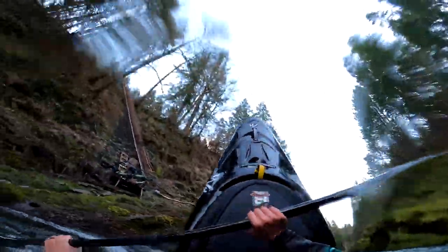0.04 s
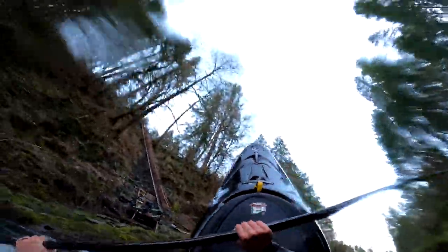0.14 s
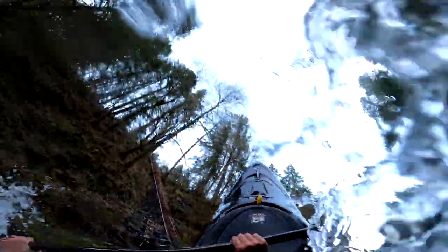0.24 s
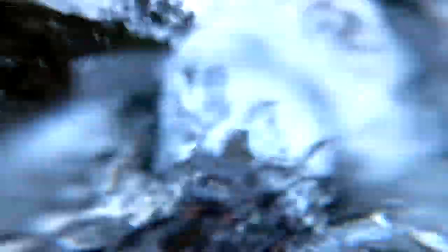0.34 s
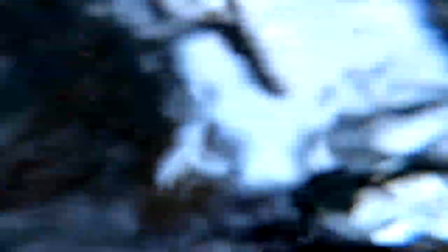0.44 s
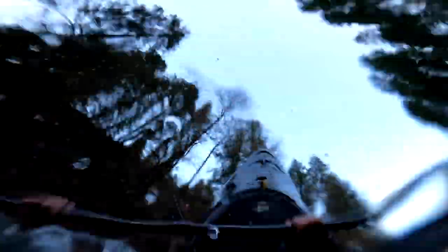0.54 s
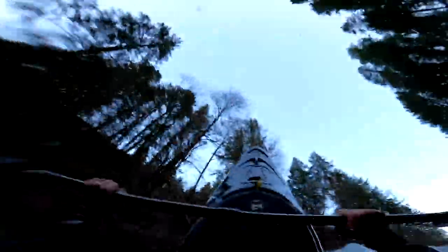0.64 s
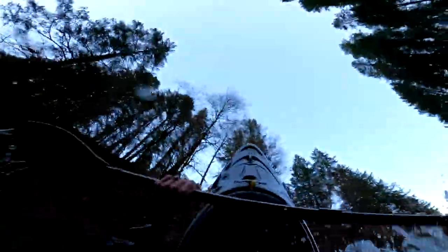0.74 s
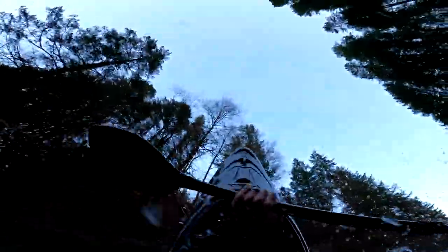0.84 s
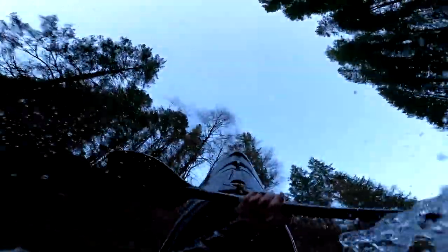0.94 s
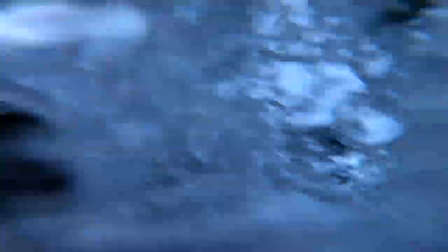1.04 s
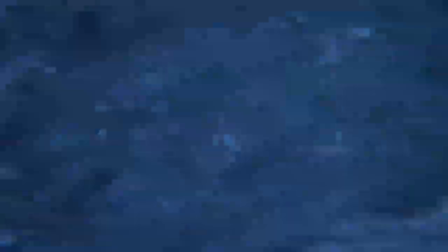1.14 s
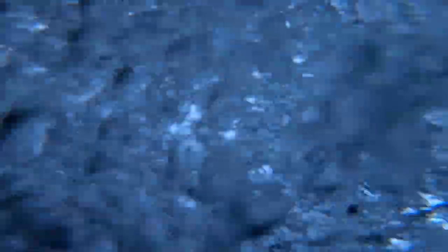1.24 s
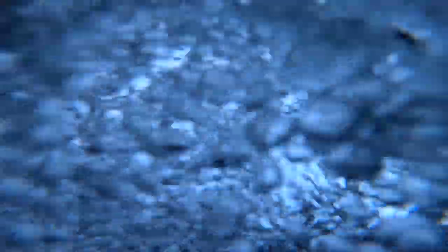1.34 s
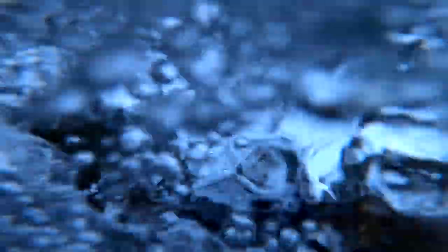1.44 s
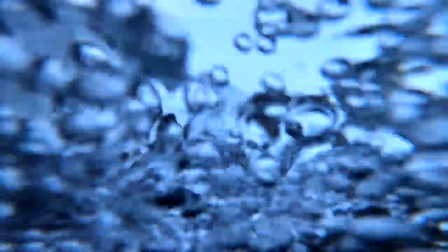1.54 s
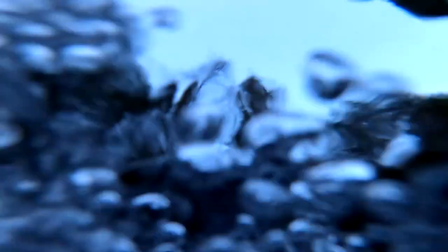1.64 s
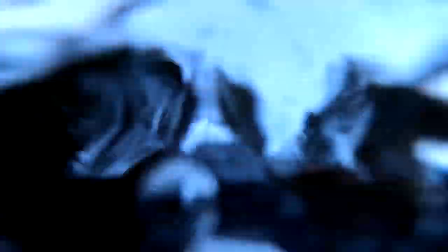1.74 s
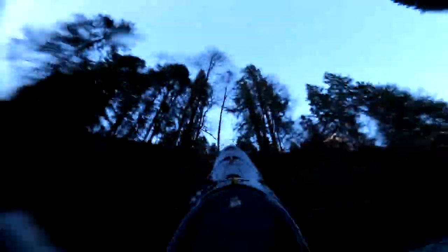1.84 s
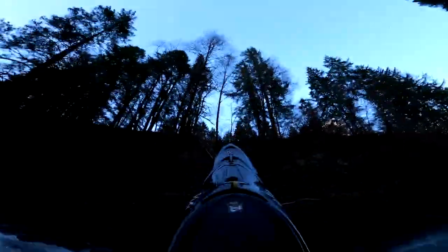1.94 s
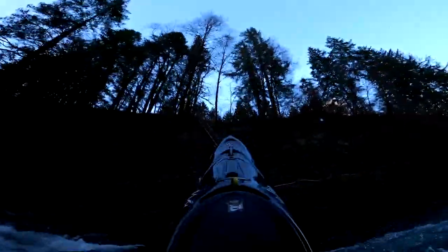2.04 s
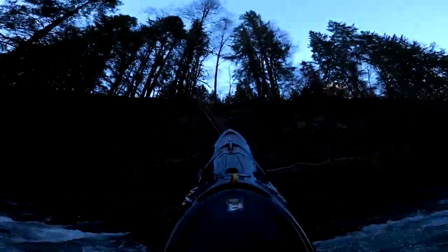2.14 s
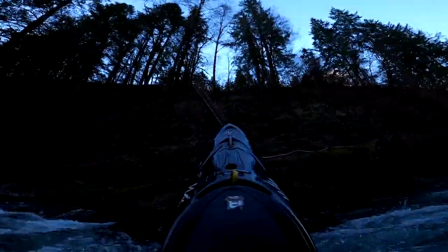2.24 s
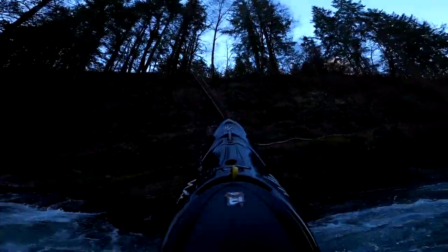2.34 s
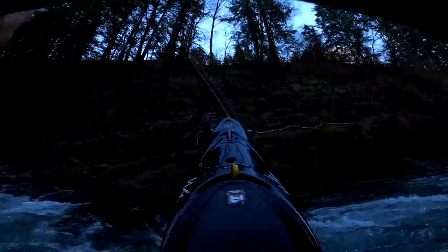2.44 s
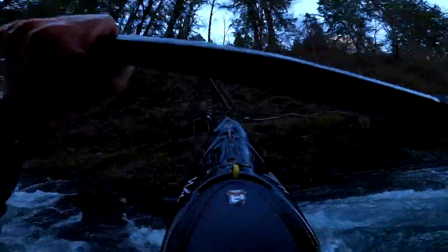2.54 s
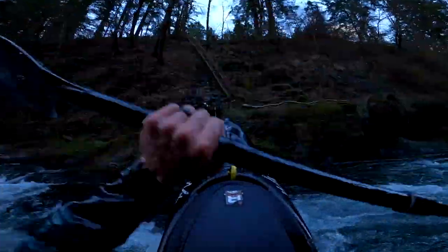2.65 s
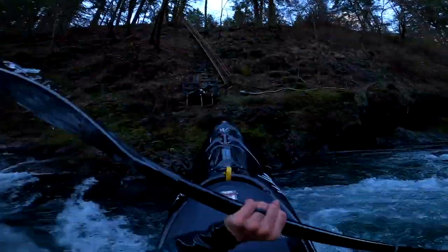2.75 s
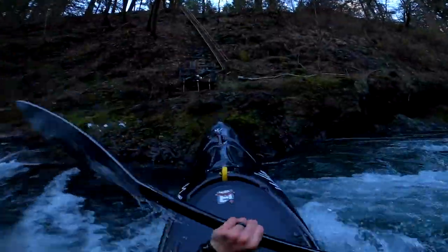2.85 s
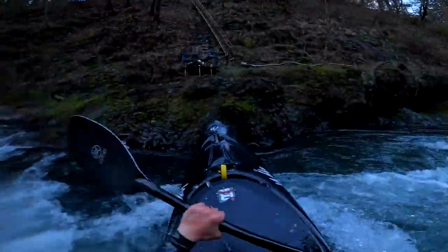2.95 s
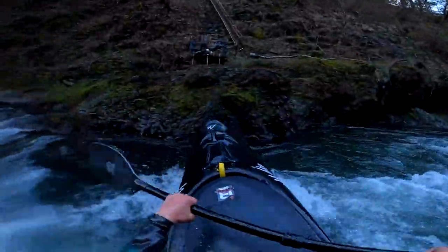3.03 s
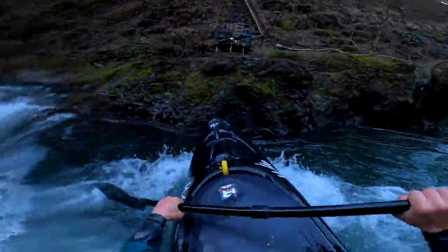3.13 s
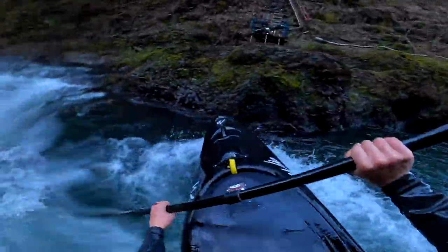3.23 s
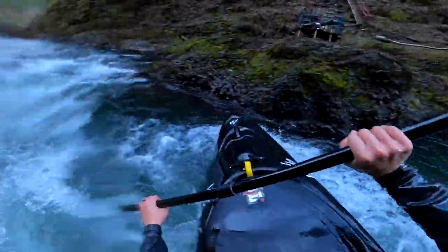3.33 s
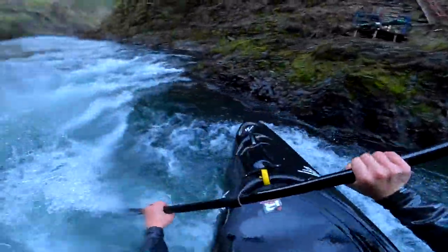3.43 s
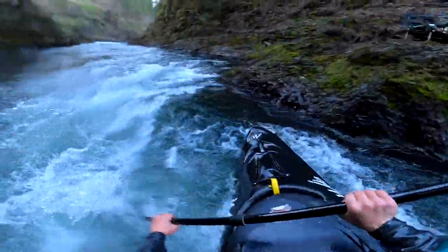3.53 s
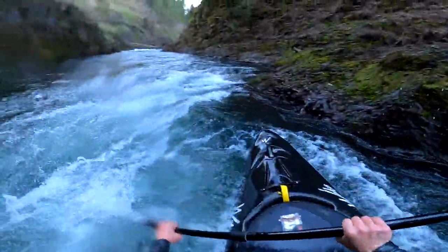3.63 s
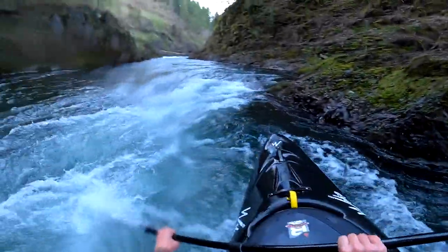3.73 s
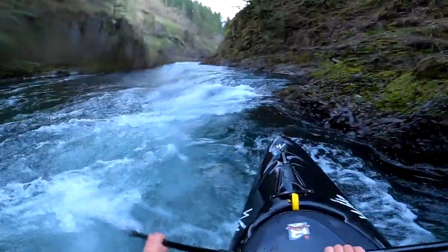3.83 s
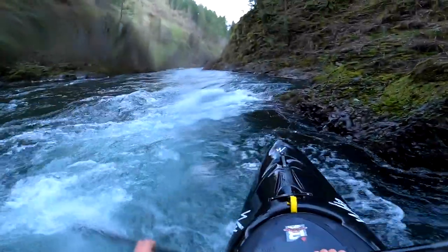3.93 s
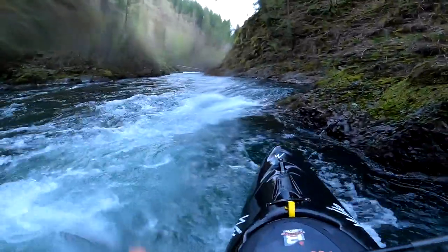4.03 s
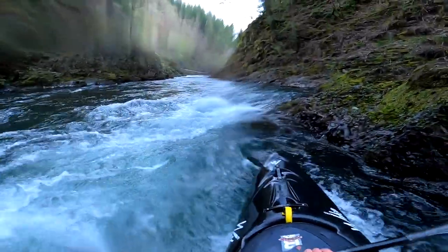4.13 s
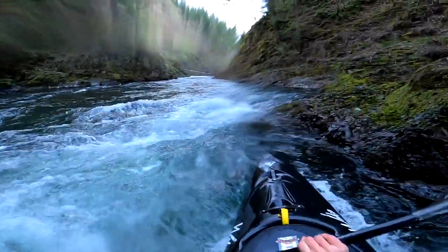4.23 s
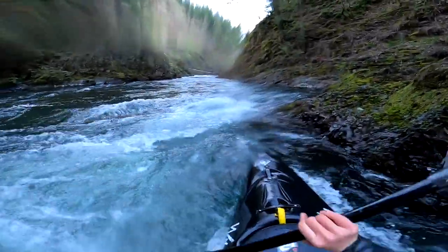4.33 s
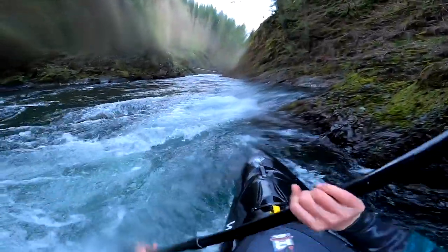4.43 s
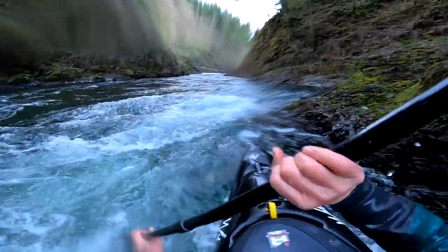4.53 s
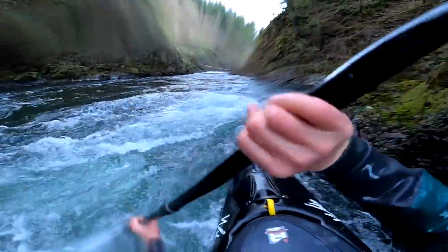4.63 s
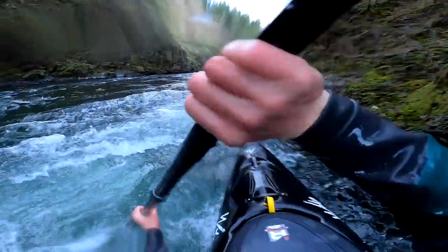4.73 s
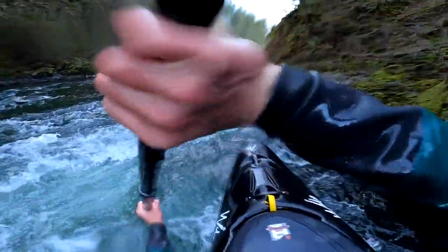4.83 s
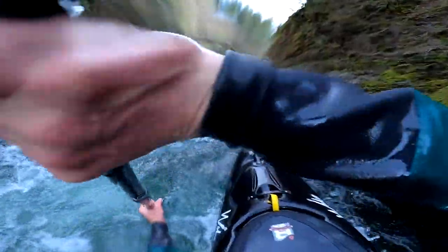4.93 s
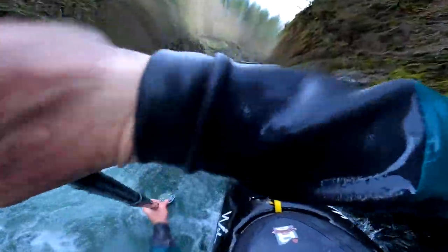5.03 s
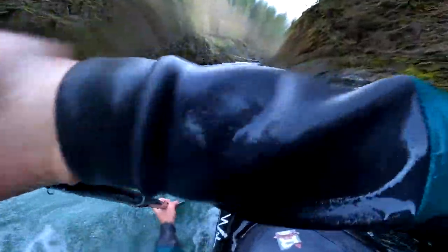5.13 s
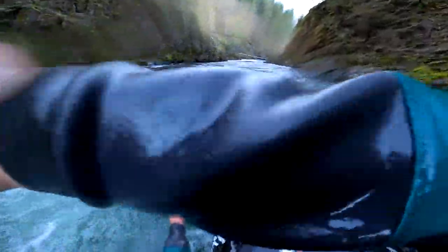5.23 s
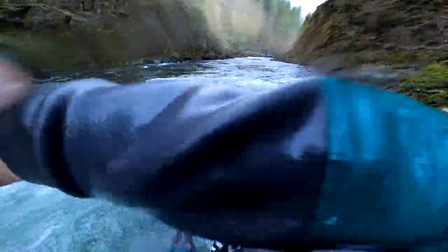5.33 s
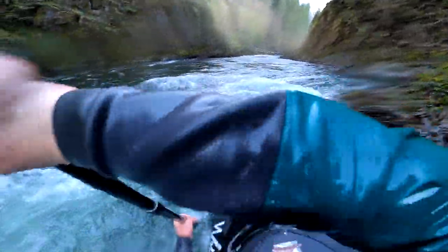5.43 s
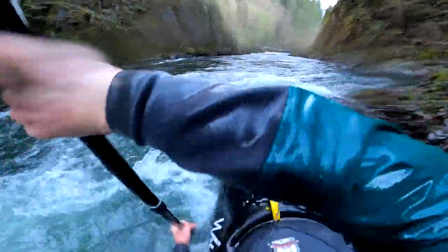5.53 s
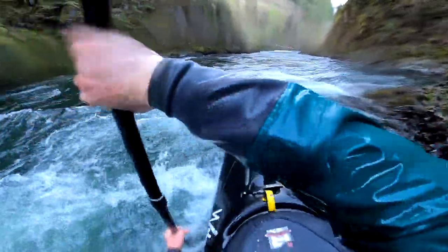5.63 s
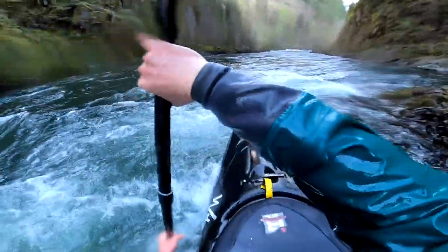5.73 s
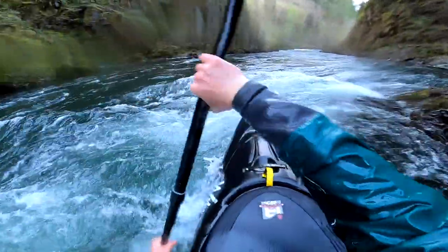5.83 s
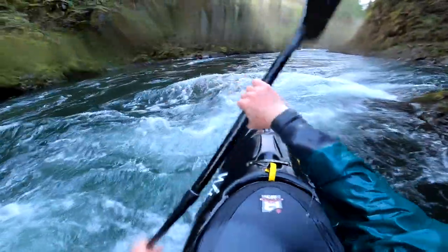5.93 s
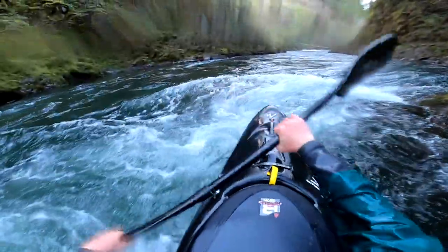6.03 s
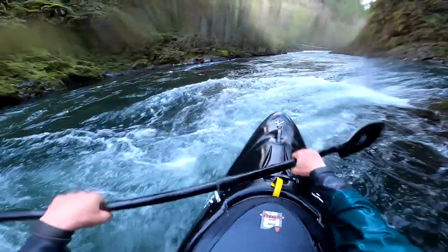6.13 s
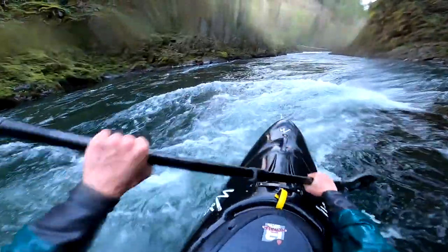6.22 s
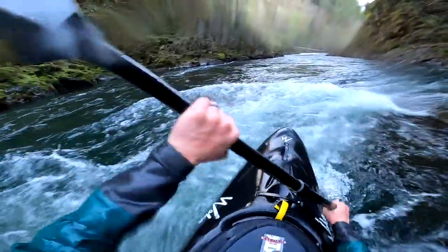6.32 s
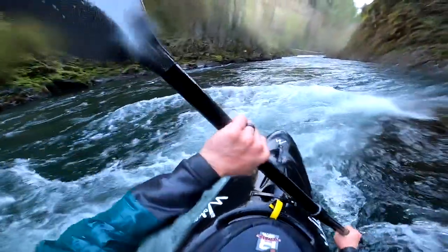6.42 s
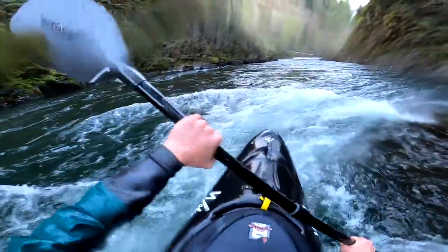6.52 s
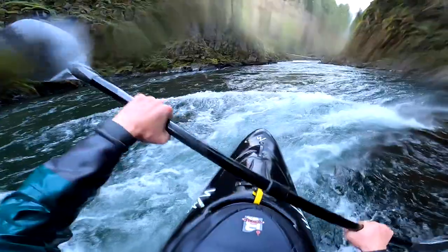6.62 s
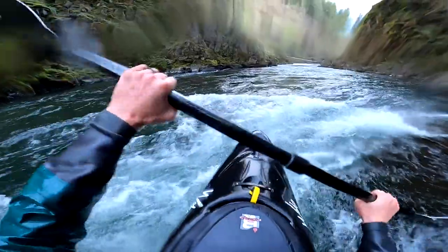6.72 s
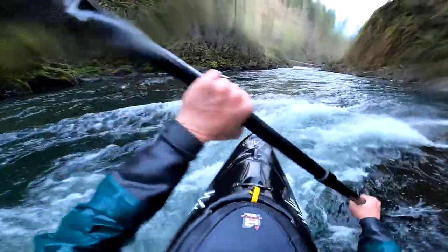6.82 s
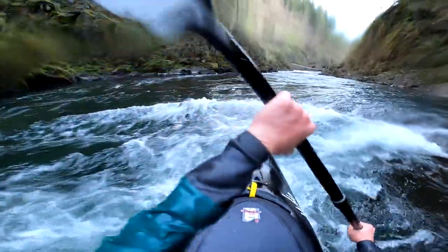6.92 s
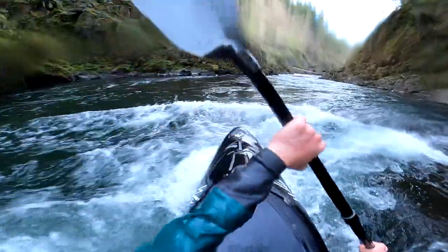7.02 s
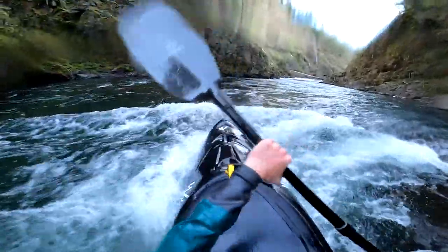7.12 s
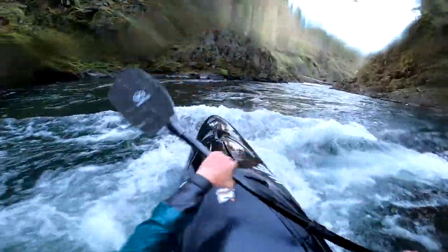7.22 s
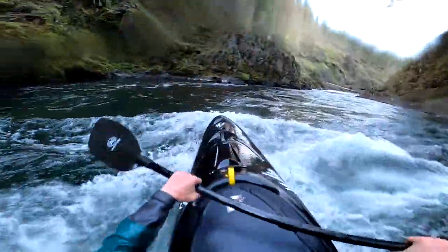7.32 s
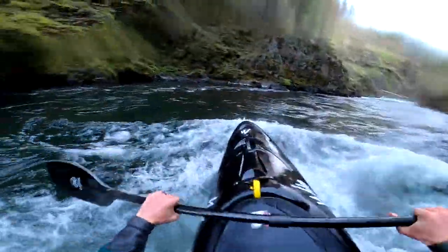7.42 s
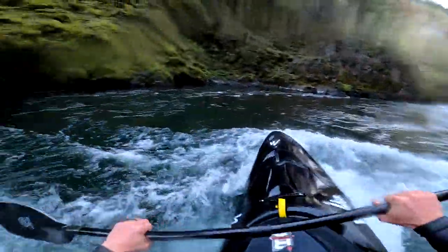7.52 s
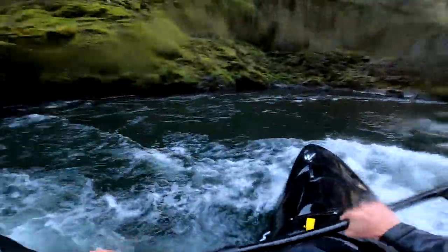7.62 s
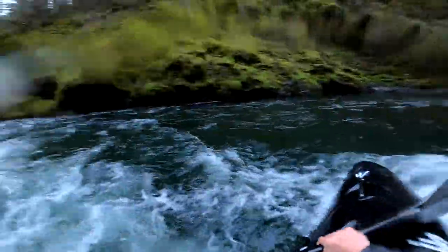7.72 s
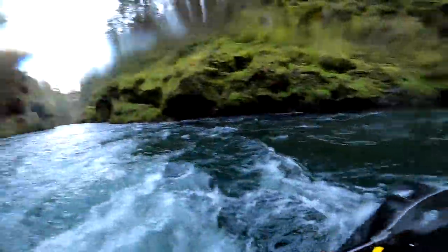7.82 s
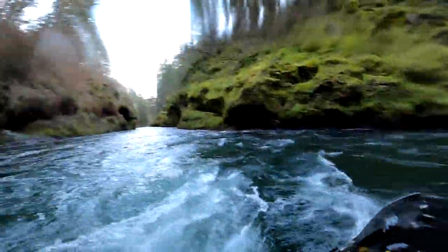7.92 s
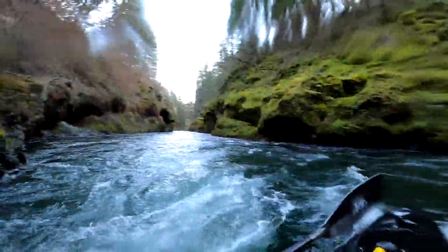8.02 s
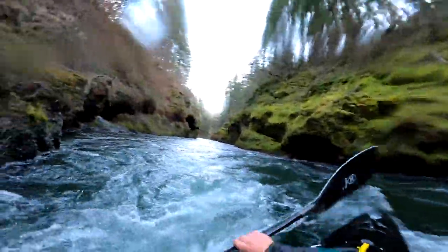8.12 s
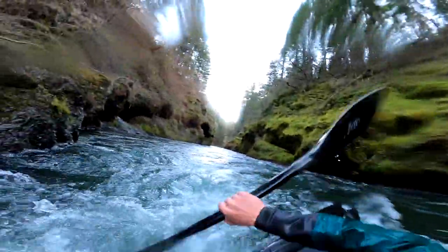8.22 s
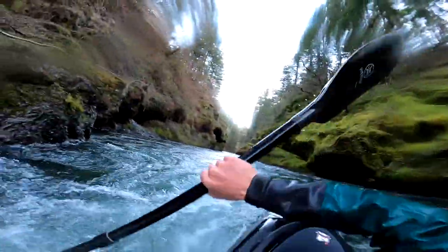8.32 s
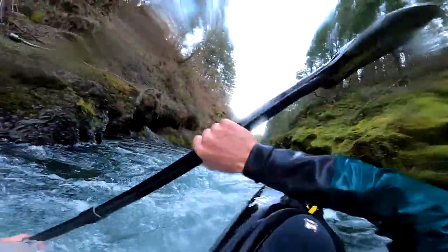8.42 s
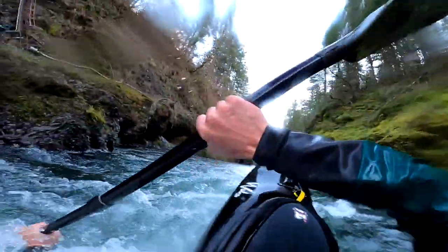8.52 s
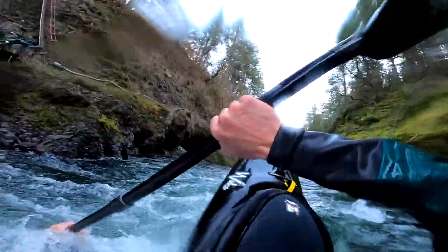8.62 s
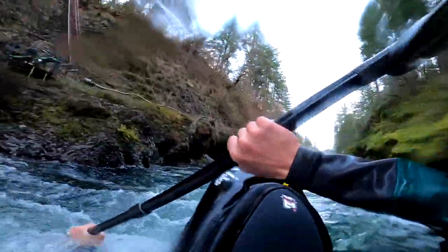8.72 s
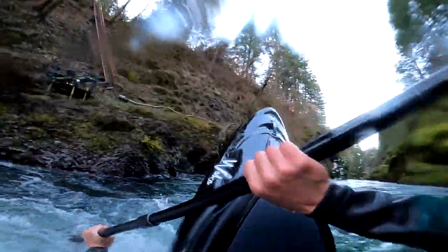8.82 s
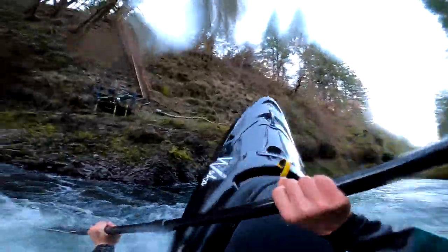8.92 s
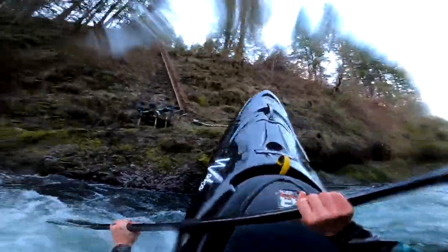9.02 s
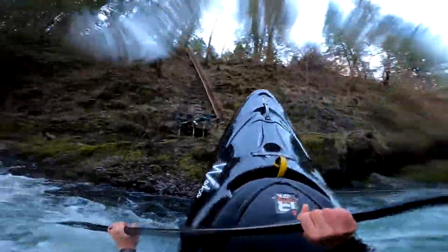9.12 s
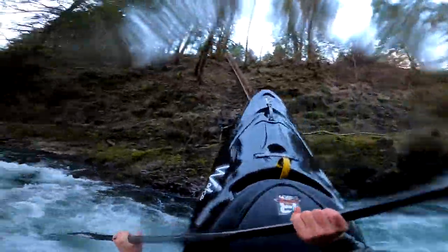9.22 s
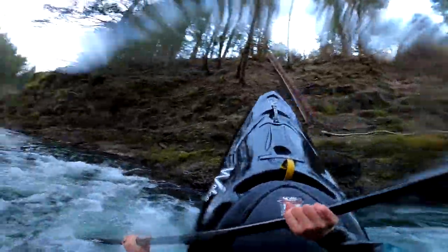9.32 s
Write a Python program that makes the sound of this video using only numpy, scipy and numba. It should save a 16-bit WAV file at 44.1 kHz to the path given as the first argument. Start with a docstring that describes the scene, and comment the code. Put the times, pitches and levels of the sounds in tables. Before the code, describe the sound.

Waves swamp a kayaker's wet microphone with bubbling gulps and bursts, then a hush, then dull whitewater roar, slosh and low wind buffeting.

```python
"""A dull, bubbly river roar with gulps, hissing spray, ticks and deep buffeting, heard through a wet microphone.
A waterproof camera on a kayaker's helmet is swamped by waves, comes up wet and rides the rapids.
Coloured noise and random drops make the roar, slosh, spray, fizz and buffeting; fading sine waves
make the bubbles and gulps. Drops tick as noise splats with a ring; squelches are narrow gliding hisses."""
import sys
import numpy as np
from scipy import signal
from scipy.fft import rfft, irfft, next_fast_len
from scipy.io import wavfile
from scipy.ndimage import uniform_filter1d
from numba import njit

SR = 44100
rng = np.random.default_rng(int(sys.argv[2]) if len(sys.argv) > 2 else 0)


def file_out(sig):
    """Save sig as 16-bit WAV at sys.argv[1]."""
    # one column per channel
    cols = np.atleast_2d(sig).T
    # limit, then scale
    lim = np.clip(cols, -1, 1)
    pcm = np.round(lim * 32767).astype(np.int16)
    wavfile.write(sys.argv[1], SR, pcm)


N = 412776

# How the river flows past the wet port, before waves and gusts are added.
# Each row: time in seconds, then base levels in dB of roar, buffeting, slosh and spray.
RIVER_LEVELS = [(0.0, -22, -33, -37.5, -58.5), (0.15, -22.5, -27.5, -38, -53), (0.43, -28, -35, -39, -44),
                (0.55, -34, -41, -36, -62), (0.681, -35.5, -38.5, -49, -59), (1.08, -34, -40.5, -54.5, -68),
                (2.05, -37.5, -34, -60.5, -63), (2.45, -38, -46.5, -58.5, -63.5),
                (2.66, -38.5, -40, -52, -67.5), (2.82, -31.5, -38.5, -48, -64),
                (2.98, -32.5, -36, -37, -58), (3.2, -27, -47, -35.5, -56), (3.4, -26, -36.5, -38, -54),
                (3.6, -24.5, -57, -42.5, -50.5), (3.85, -25, -29, -41.5, -49.5),
                (4.049, -27.5, -45, -39.5, -56), (4.6, -24.5, -50.5, -35.5, -54.5),
                (5.3, -23.5, -36.5, -37.5, -55.5), (5.6, -22.5, -35.5, -34.5, -54.5),
                (5.72, -23.5, -36, -43, -51), (6.03, -25, -31.5, -42.5, -55.5),
                (6.17, -22.5, -36.5, -34.5, -56), (6.45, -27, -30, -35.5, -55), (6.65, -24, -35, -37, -54),
                (6.9, -22, -41.5, -33.5, -53.5), (7.2, -23, -35, -38, -53), (7.501, -21, -24.5, -31, -49.5),
                (8.12, -21, -39.5, -27.5, -50), (8.25, -20.5, -31, -35, -50), (8.66, -23, -30.5, -42, -51),
                (8.88, -25, -26.5, -43, -52), (9.1, -19.5, -22, -33, -52), (9.36, -18, -23, -35, -53)]
# Waves washing over the camera.
# Each row: start in seconds, length in seconds, drain time in seconds (to fall to 37 % in loudness gain),
# base levels in dB of roar, buffeting, slosh, spray and fizz, and gurgle centre pitch in Hz at mid-wave.
WAVES = [(0.166, 0.049, .015, -19.5, -16, -24.5, -34, -56, 269.5),
         (0.224, 0.07, 0.022, -23, -21.5, -24.5, -37, -60, 270),
         (0.282, 0.039, 0.016, -14.5, -36, -28, -32.5, -48, 276),
         (0.335, 0.049, 0.0033, -13, -29, -26, -34, -56, 294),
         (0.458, 0.054, 0.016, -16.5, -18, -24.5, -38, -61, 223.4),
         (0.481, 0.041, 0.029, -14, -32, -44.5, -37, -50, 242),
         (0.557, 0.047, 0.029, -18, -26, -32, -50, -73.5, 258),
         (0.645, 0.03, 0.012, -23.5, -44, -35, -58, -79, 306),
         (0.732, 0.1, .02, -28.5, -24.5, -66, -58.5, -77.5, 221),
         (0.944, 0.073, 0.087, -37, -40, -53, -54, -74, 250),
         (1.072, 0.053, .01, -31.5, -55, -42, -50, -72, 293),
         (1.126, 0.055, 0.007, -26, -40, -29, -43, -67, 327),
         (1.165, 0.027, 0.013, -32, -24.5, -41, -39.5, -54, 303),
         (1.176, 0.056, 0.027, -18, -24, -62.5, -45.5, -62, 247),
         (1.251, 0.03, 0.015, -11.5, -15, -26, -34, -50.5, 234.5),
         (1.284, 0.05, 0.012, -16, -26, -27, -30, -49.5, 231),
         (1.337, 0.023, 0.009, -20.5, -26, -31, -40, -49.5, 227),
         (1.36, 0.12, .015, -22.5, -22.5, -61.5, -78, -99, 221),
         (1.478, 0.31, .015, -21, -24, -53.5, -60.5, -88, 305),
         (1.703, 0.1, 0.027, -21, -20, -39.5, -48, -84, 312),
         (1.749, 0.096, 0.022, -15.5, -22, -35.5, -45.5, -70, 295),
         (1.847, 0.099, 0.05, -19.5, -20, -58, -50, -83, 201),
         (2.997, 0.06, .02, -35, -37, -36.5, -55, -82, 302),
         (3.053, 0.078, 0.088, -31, -37, -32.5, -51, -67, 305),
         (8.261, 0.098, .03, -22.5, -36, -52, -40.5, -62, 306),
         (8.333, 0.094, 0.12, -16.5, -27.5, -57, -41.5, -62, 296)]
# Gusts on the microphone membrane. Each row: centre in seconds, buffeting level in dB.
GUSTS = [(2.66, -32.5), (3.53, -32), (3.67, -33), (3.8, -31), (4.13, -39), (4.61, -39), (6.13, -23),
         (6.33, -27), (7.11, -24.5), (7.639, -22), (9.2, -14)]
# When water closes over the port and clears again.
# One row: starts closing, fully closed, starts clearing and fully clear, all in seconds.
SWAMPED_TIMES = [.15, .17, 1.95, 2.1]

# Tone colour of the river's roar. Each row: frequency in Hz, relative strength in dB per Hz.
ROAR_COLOUR = [(71, -35), (120, -15), (150, 0.5), (220, 0), (295, 1.5), (527, 2), (772, -1.5), (950, -20),
               (1240, -36.5), (2090, -120)]
# Tone colour of wind and water pushing the membrane. Each row: frequency in Hz, relative strength in dB per Hz.
BUFFET_COLOUR = [(8.8, -30), (15, -2), (49, -1.5), (130, -5.5), (170, -24), (290, -120)]
# Tone colour of the slosh. Each row: frequency in Hz, relative strength in dB per Hz.
SLOSH_COLOUR = [(530, -23), (900, -0.5), (1600, -19), (2200, -37), (3520, -120)]
# Spray through the housing's resonances. Each row: frequency in Hz, relative strength in dB per Hz.
SPRAY_COLOUR = [(1450, -34.5), (1600, -6), (1800, 0), (2050, -2.5), (2400, -7.5), (2650, -5.5),
                (2800, -2.5), (2950, -8.5), (3150, -11.5), (3500, -20.5), (3800, -47)]
# Waves bursting against the port. Each row: frequency in Hz, relative strength in dB per Hz.
GUSH_COLOUR = [(880, -29.5), (1500, -0.5), (2390, -8), (2840, -10), (3600, -20), (4680, -48.5),
               (7920, -120)]
# The high fizz above the spray. Each row: frequency in Hz, relative strength in dB per Hz.
FIZZ_COLOUR = [(3200, -32), (3500, -3), (4000, -5), (4700, -6.5), (5300, -11), (6800, -14.5), (8000, -26.5),
               (12000, -48)]
# Fine spray thrown by a wave. Each row: frequency in Hz, relative strength in dB per Hz.
SPATTER_COLOUR = [(3200, -35), (3600, 2), (5000, -9), (7000, -19), (9000, -13.5), (12500, -24)]

# Air pockets gulping in the port.
# Each row: start in seconds, relative strength in dB, first pitch in Hz, time to fade by 60 dB in seconds.
GULPS = [(0.167, -2.5, 332, 0.026), (0.33, -4.5, 230, 0.22), (0.376, -2, 490, 0.032),
         (0.388, -3.5, 107, 0.066), (0.515, 0.5, 235, 0.17), (0.567, -1.5, 247, 0.039),
         (0.623, -2.5, 315, 0.014), (0.76, -2, 333, 0.023), (0.801, -6, 116, 0.048),
         (1.003, -11.5, 36, 0.11), (1.186, -3.5, 420, 0.025), (1.198, 5.5, 235, 0.018),
         (1.231, -5, 161, 0.13), (1.264, -1, 228, 0.03), (1.279, 3.5, 255, 0.022), (1.293, 4.5, 152, 0.036),
         (1.324, -4, 192, 0.06), (1.354, -6, 260, 0.029), (1.405, -7.5, 303, 0.037),
         (1.436, -6.5, 224, 0.096), (1.48, -5.5, 302, 0.076), (1.518, -6.5, 310, 0.11),
         (1.53, -4, 305, 0.083), (1.587, -6.5, 323, 0.13), (1.598, -18.5, 614, 0.091),
         (1.644, -3.5, 328, 0.05), (1.65, -12.5, 593, 0.094), (1.755, -16, 300, 0.052),
         (1.775, -21, 837, 0.079), (1.688, -6, 262, 0.044), (1.72, -13, 286, 0.076), (1.73, -9, 62, 0.18),
         (1.8, -10, 300, 0.046), (1.83, -11, 278, 0.09), (1.87, -4.5, 281, 0.069), (1.938, -5, 119, 0.079),
         (2.029, -9.5, 168, 0.038), (2.965, -18, 527, 0.028), (3.046, -11, 770, 0.027),
         (3.2, -12, 188, 0.037), (3.318, -14, 676, 0.018), (3.363, -11, 570, .025), (3.802, -16, 328, 0.12),
         (3.85, -16, 195, 0.12), (5.568, -8, 554, 0.037), (5.645, -12, 328, 0.04), (6.098, -11, 70, 0.052),
         (6.311, -9.5, 95, 0.077), (6.609, -7.5, 287, 0.07), (7.1, -16, 165, 0.11),
         (7.718, -16, 730, 0.024), (8.348, 2.5, 260, 0.015), (8.373, -18, 300, .05),
         (8.394, -10.5, 103, 0.14), (8.405, -7, 515, 0.08), (8.436, -5, 397, 0.02), (8.542, -2, 300, 0.023),
         (9.04, -4.5, 179, 0.062), (9.121, -4, 90, .06), (9.166, -4, 154, 0.069), (9.189, -5, 108, 0.045),
         (9.222, -3.5, 171, 0.047), (9.257, -3.5, 155, 0.066)]
# Air squeezed through the port as it fills or drains.
# Each row: start in seconds, length in seconds, relative level in dB, first pitch in Hz, last pitch in Hz.
SQUELCHES = [(0.194, 0.032, -31, 1800, 1590), (0.248, 0.044, -36, 1984, 2210),
             (0.296, 0.079, -20, 624, 562), (0.462, 0.038, -26, 1196, 1696),
             (0.586, 0.036, -29, 1113, 1450), (0.613, 0.022, -22, 303, 664), (1.1, 0.033, -35, 1307, 1614),
             (1.136, 0.047, -26, 1314, 1417), (1.156, .04, -24.5, 901, 498),
             (1.297, 0.022, -22.5, 994, 1270), (1.321, 0.027, -31, 1417, 1486),
             (1.349, 0.055, -53, 2020, 1990), (1.507, 0.039, -51.5, 1434, 1590),
             (1.809, 0.048, -34, 1707, 1785), (1.843, .05, -19, 214, 288), (1.952, 0.14, -55, 1385, 1650),
             (8.504, 0.066, -17, 199, 337)]
# Drops and slaps on the case. Each row: start in seconds, relative strength in dB, pitch in Hz.
TICKS = [(0.1915, -8, 1200), (0.194, -23, 2520), (0.193, -48, 3950), (0.303, -20, 1225), (0.342, -32, 3800),
         (0.373, -24, 2600), (0.425, -37, 2250), (0.4705, -39, 3200), (0.485, -30, 2920),
         (0.59, -37.5, 2900), (0.605, -44, 1480), (0.625, -41, 2510), (0.74, -36, 1550),
         (1.1095, -37, 2600), (1.14, -24.5, 1960), (1.187, -16, 1055), (1.237, -36, 2900),
         (1.261, -29, 1470), (1.306, -12.5, 1123), (1.546, -47.5, 2800), (1.49, -51, 1650),
         (1.575, -44, 2300), (1.654, -35, 1700), (1.638, -26, 1180), (1.6914, -32, 1220),
         (1.736, -35, 3400), (1.762, -26, 1710), (1.8225, -19, 1020), (1.833, -46, 4700),
         (1.886, -44, 2200), (1.912, -25, 1050), (1.942, -40, 1130), (1.962, -44, 1500), (1.974, -44, 1600),
         (2.03, -49, 1500), (2.091, -42, 1510), (2.1539, -49, 1800), (2.189, -44, 1870), (2.809, -31, 1100),
         (2.814, -60, 3800), (2.851, -28, 1070), (2.853, -41, 1850), (3.045, -37, 1000),
         (3.5096, -23, 1080), (3.5907, -36, 1780), (3.608, -48, 1990), (3.623, -37.5, 2080),
         (3.81, -42, 2580), (3.945, -43, 2600), (6.412, -56, 3760), (6.438, -43, 2600), (6.627, -60, 4740),
         (6.785, -48, 2620), (6.856, -50, 3000), (7.183, -40.5, 2650), (7.298, -49, 3800),
         (7.3185, -38, 2500), (7.298, -52, 5000), (8.131, -26, 1700), (8.346, -26, 1760),
         (9.028, -33, 1800)]

WAVE_ATTACK_S, GUST_S = 0.021, 0.038  # wave rise; time from a gust's centre to 37 % gain
# river fizz over quiet spray, and dB gained per dB of spray
FIZZ_RIDE_DB, FIZZ_RIDE_SLOPE, QUIET_SPRAY_DB = -66.5, 0.86, -51.0
GULP_RISE_OCT_S = 0.9  # octaves per second
TICK_T60_S, SPLAT_T60_S = 0.021, 0.0084  # time for the fading part to drop by 60 dB
SQUELCH_WIDTH = 0.22  # bandwidth divided by mean pitch
SELF_NOISE_DB, TOP_HZ = -104, 13200


def undb(db):
    """Turn decibels into gain."""
    return 10 ** (np.asarray(db) / 20)


def unit(x):
    """Scale a sound to an average (rms) strength of 1."""
    return x / np.sqrt(np.mean(x ** 2))


def walk(rate):
    """A wandering level: random steps, rate per second, smoothed twice and scaled to rms 1."""
    k = int(SR / rate)
    steps = np.repeat(rng.standard_normal(N // k + 1), k)
    smooth = uniform_filter1d(uniform_filter1d(steps, k), k)
    return unit(smooth[:N])


def flow(t):
    """Gains of roar, buffeting, slosh, spray and fizz: river, waves and gusts add in power."""
    s, *db = np.transpose(RIVER_LEVELS)
    db.append(FIZZ_RIDE_DB + FIZZ_RIDE_SLOPE * (db[3] - QUIET_SPRAY_DB))
    power = undb([np.interp(t, s, column) for column in db]) ** 2
    for start, length, drain, *db, _ in WAVES:
        span = slice(int(start * SR), int((start + length + 8 * drain) * SR))
        age = t[span] - start
        rise = np.clip(age / WAVE_ATTACK_S, 0, 1)
        fall = np.exp(-np.maximum(age - length, 0) / drain)
        power[:, span] += np.outer(undb(db), rise * fall) ** 2
    for centre, db in GUSTS:
        power[1] += (undb(db) * np.exp(-np.abs(t - centre) / GUST_S)) ** 2
    return np.sqrt(power)


def rush(colour, grain_db, rate, swell_db, flicker_db, flicker_rate, count):
    """Hiss and bursting drops in one tone colour, split into bands that each flicker by themselves."""
    hz, db = np.transpose(colour)
    chance = rng.random((3, N))
    happens = chance[0] < rate / SR
    sign = np.sign(chance[1] - .5)
    drops = happens * sign * undb(15.0 * chance[2] ** 2)  # a few drops are larger than the rest
    raw = rng.standard_normal(N) + undb(grain_db) * unit(drops)
    size = next_fast_len(N)
    log_hz = np.log(np.maximum(np.fft.rfftfreq(size, 1 / SR), 1))
    spectrum = rfft(raw, size) * undb(np.interp(log_hz, np.log(hz), db, -120, -120))
    place = np.interp(log_hz, np.log(hz[[0, -1]]), [0, count - 1])
    out = 0
    for k in range(count):
        # neighbouring bands overlap and their weights add to one
        weight = np.cos(np.pi / 2 * np.clip(place - k, -1, 1)) ** 2
        band = irfft(spectrum * weight, size)[:N]
        out = out + band * undb(flicker_db * walk(flicker_rate))
    return unit(out * undb(swell_db * walk(flicker_rate)))


@njit
def rings(n, start, hz, decay, swell, rise, size):
    """Fading sine waves with a soft start, whose pitch may climb as the bubble nears the surface."""
    out = np.zeros(n)
    for k in range(len(start)):
        gain, step, phase, onset = size[k], hz[k], 0., 1.  # step: radians per sample
        for i in range(int(start[k]), n):
            out[i] += gain * (1 - onset) * np.sin(phase)
            phase += step
            step *= rise[k]
            gain *= decay[k]
            onset *= swell[k]
            if gain < size[k] / 1000:
                break
    return out


def ring(s, gain, hz, t60, rise, onset_cycles):
    """Play fading sine waves given in seconds, Hz and octaves per second."""
    decay = np.exp(-np.log(1000) / (np.maximum(t60, .002) * SR))
    swell = np.exp(-hz / (onset_cycles * SR))
    return rings(N, s * SR, 2 * np.pi * hz / SR, decay, swell, 2 ** (rise / SR), gain)


def dull(x, top_hz):
    """Water in the port takes the edge off: frequencies above top_hz fade away."""
    return signal.sosfilt(signal.butter(5, top_hz, fs=SR, output="sos"), x)


def bubbles(centre_hz, rate, spread, cycles, size_db, top_hz):
    """A swarm of ringing bubbles, rate per second, tuned up to spread octaves from a centre pitch."""
    when, tune, size = rng.random((int(rate * N / SR), 3)).T
    s = when * N / SR
    hz = centre_hz[(s * SR).astype(int)] * 2 ** (spread * (2 * tune - 1))
    gain = undb(size_db * size ** 2)
    swarm = ring(s, gain, hz, cycles / hz, 0.33 * hz / cycles, onset_cycles=0.48)
    return unit(dull(swarm, top_hz))


def river_roar(t, swamped):
    """Flowing water as low noise with froth; under water it partly turns into a bubbling gurgle."""
    start, length, *_, pocket_hz = np.transpose(WAVES)
    centre_hz = np.interp(t, start + length / 2, pocket_hz)
    under = 0.5 * swamped
    river = rush(ROAR_COLOUR, grain_db=-7.0, rate=400., swell_db=-0.55,
                 flicker_db=1.45, flicker_rate=18., count=5)
    froth = bubbles(np.full(N, 380.), rate=250., spread=1.1, cycles=13.0, size_db=4.5, top_hz=950.0)
    gurgle = bubbles(centre_hz, rate=130.0, spread=0.46, cycles=9.9, size_db=8.5, top_hz=940.0)
    open_roar = unit(river + undb(-11.0) * froth)
    return np.sqrt(1 - under) * open_roar + np.sqrt(under) * gurgle


def sloshing(swamped):
    """Moving water as mid-pitched noise and burbling bubbles, which grow stronger when swamped."""
    burble = bubbles(np.full(N, 1400.), rate=130.0, spread=0.45, cycles=18.0, size_db=8.5, top_hz=2130.0)
    wash = rush(SLOSH_COLOUR, grain_db=-2.5, rate=300., swell_db=0.5,
                flicker_db=1.3, flicker_rate=25.0, count=4)
    return undb(-17.5 + 9.0 * swamped) * burble + wash


def spraying(swamped):
    """Spray hisses through the housing; when swamped, a flatter gush replaces it and bubbles plip more."""
    plips = bubbles(np.full(N, 2200.), rate=64.0, spread=0.45, cycles=36.0, size_db=15.0, top_hz=3250.0)
    hiss = rush(SPRAY_COLOUR, grain_db=-6.0, rate=460.0, swell_db=1.0,
                flicker_db=1.1, flicker_rate=30., count=4)
    gush = rush(GUSH_COLOUR, grain_db=-5.0, rate=250., swell_db=1.2,
                flicker_db=2.5, flicker_rate=60., count=3)
    mix = np.sqrt(1 - swamped) * hiss + np.sqrt(swamped) * gush
    return mix + undb(-13.5 + 7.0 * swamped) * plips


def fizzing(swamped):
    """High, fine noise that gives way to unsteady spatter from the waves when swamped."""
    fine = rush(FIZZ_COLOUR, grain_db=-6.5, rate=300.0, swell_db=.6,
                flicker_db=.8, flicker_rate=40., count=3)
    spatter = rush(SPATTER_COLOUR, grain_db=-5.5, rate=200., swell_db=1.0,
                   flicker_db=4.0, flicker_rate=35.0, count=2)
    return np.sqrt(1 - swamped) * fine + np.sqrt(swamped) * spatter


def gulps():
    """Large air pockets ring with a rising pitch; each starts with a drop in pressure."""
    s, db, hz, t60 = np.transpose(GULPS)
    rise = np.full(len(s), GULP_RISE_OCT_S)
    return -dull(ring(s, undb(db), hz, t60, rise, onset_cycles=0.24), top_hz=1080.0)


def squelches():
    """Squeezed air makes a narrow hiss whose pitch glides."""
    out = np.zeros(N)
    for start, length, db, first_hz, last_hz in SQUELCHES:
        u = np.linspace(0, 1, int(length * SR))
        hz = first_hz * (last_hz / first_hz) ** u
        band = signal.butter(2, SQUELCH_WIDTH * hz.mean() / 2, fs=SR, output="sos")
        # two slow noises carried by a cosine and a sine make a narrow band around the pitch
        a, b = signal.sosfilt(band, rng.standard_normal((2, SR // 2)))[:, -len(u):]
        phase = 2 * np.pi * np.cumsum(hz) / SR
        hiss = unit(a * np.cos(phase) + b * np.sin(phase))
        i = int(start * SR)
        out[i:i + len(u)] += undb(db) * np.sqrt(np.sin(np.pi * u)) * hiss
    return out


def ticks():
    """Each drop is a short splat of noise around its pitch with a little ring of the case."""
    s, db, hz = np.transpose(TICKS)
    out = undb(2.5) * ring(s, undb(db), hz, np.full(len(s), TICK_T60_S), 0 * s, onset_cycles=0.45)
    t = np.arange(int(.08 * SR)) / SR
    shape = (1 - np.exp(-t / 0.0014)) * np.exp(-np.log(1000) * t / SPLAT_T60_S)
    for k, noise in enumerate(rng.standard_normal((len(s), len(t)))):
        band = signal.butter(2, [0.67 * hz[k], 1.16 * hz[k]], "bandpass", fs=SR, output="sos")
        splat = shape * unit(signal.sosfilt(band, noise))
        i = int(s[k] * SR)
        out[i:i + len(t)] += undb(db[k] + 3.0) * splat
    return out


def buffeting():
    """Wind and water push the membrane, making slowly flickering, very low noise."""
    return rush(BUFFET_COLOUR, grain_db=-15.0, rate=20.0, swell_db=1.16,
                flicker_db=-1.5, flicker_rate=10.0, count=3)


def scene():
    """River, spray and buffeting follow the waves; gulps, ticks and squelches land on top."""
    t = np.arange(N) / SR
    roar, buffet, slosh, spray, fizz = flow(t)
    swamped = np.interp(t, SWAMPED_TIMES, [0, 1, 1, 0])
    # while waves wash over the port the flow comes in lumps
    lumps = undb(swamped * 1.4 * walk(90.))
    out = roar * river_roar(t, swamped)
    out = out + slosh * lumps * sloshing(swamped)
    out = out + spray * lumps * spraying(swamped)
    out = out + fizz * lumps * fizzing(swamped)
    out = out + gulps() + squelches() + ticks()
    out = out + buffet * buffeting()
    return out[None]


def record(dry):
    """The preamp rounds peaks and hisses faintly, the wet membrane dulls sharp edges, and the top is cut."""
    rounded = np.tanh(0.71 * dry) / 0.8
    wet = signal.sosfilt(signal.butter(4, 6500., fs=SR, output="sos"), rounded)
    wet = wet + undb(SELF_NOISE_DB) * rng.standard_normal(dry.shape)
    return signal.sosfilt(signal.ellip(8, .2, 70, TOP_HZ, fs=SR, output="sos"), wet)


dry = scene()
out = record(dry)
file_out(out)
```